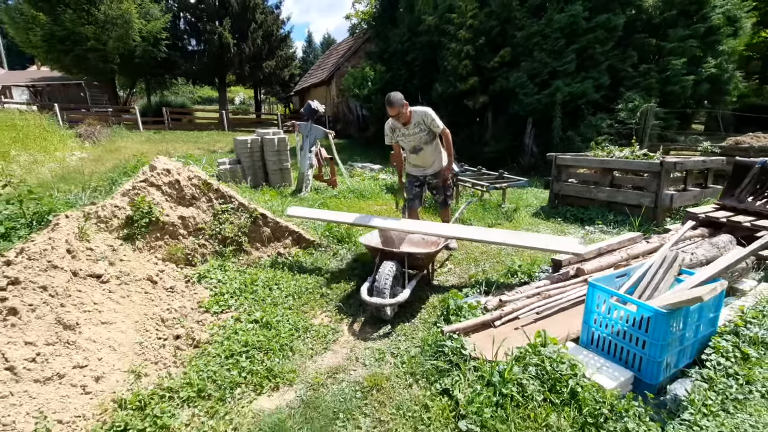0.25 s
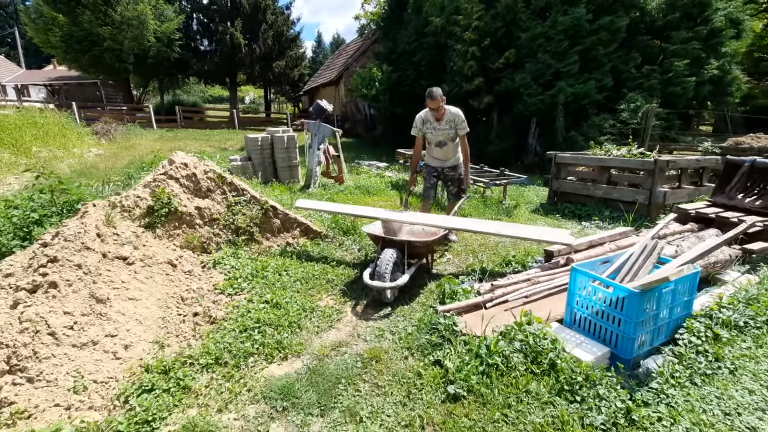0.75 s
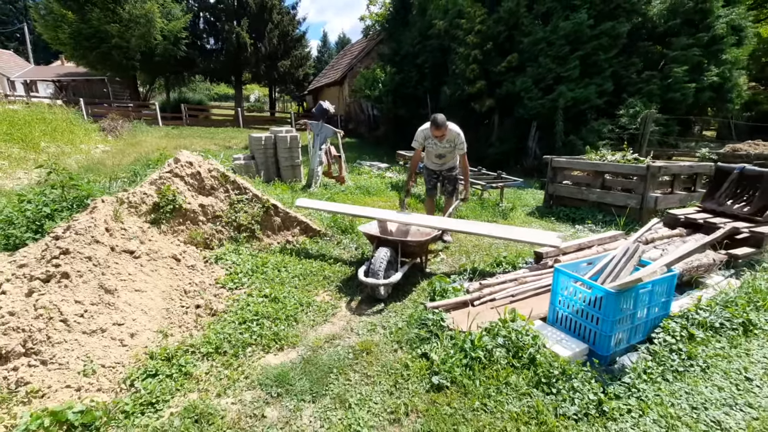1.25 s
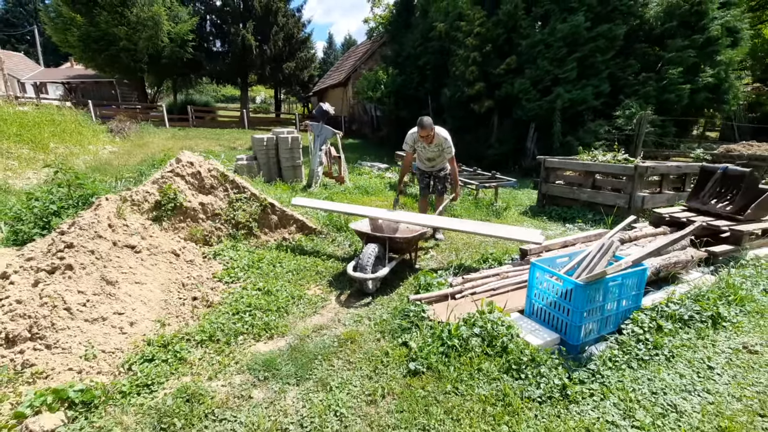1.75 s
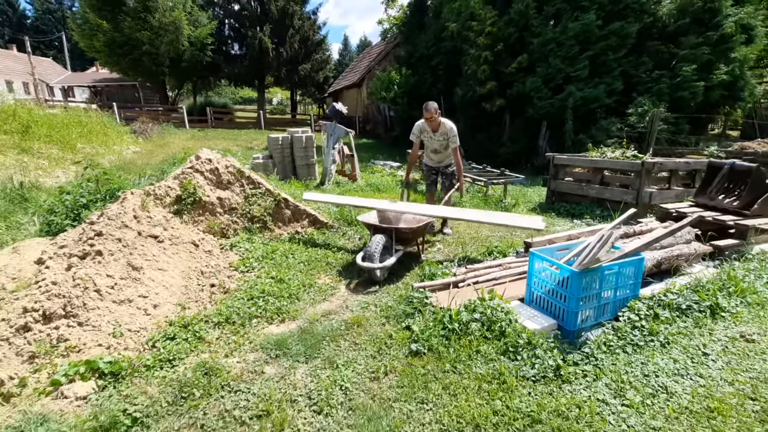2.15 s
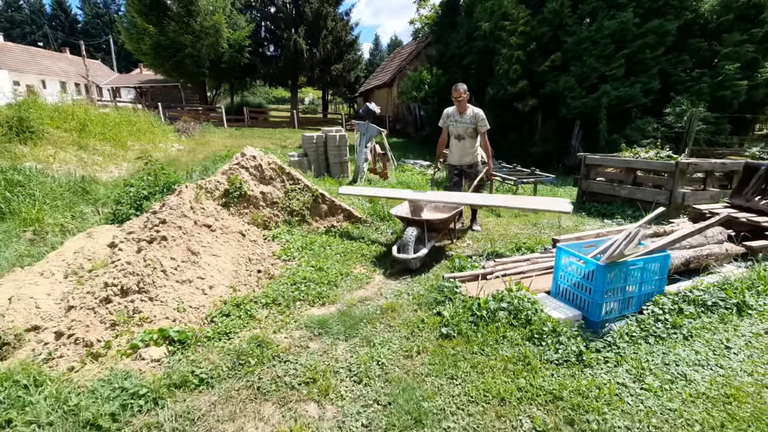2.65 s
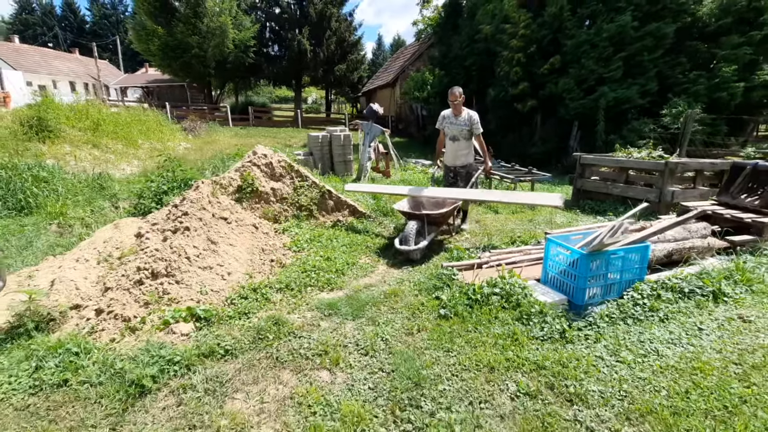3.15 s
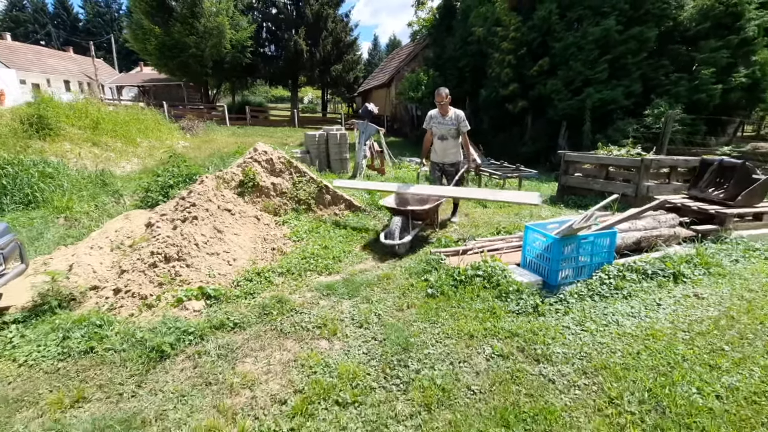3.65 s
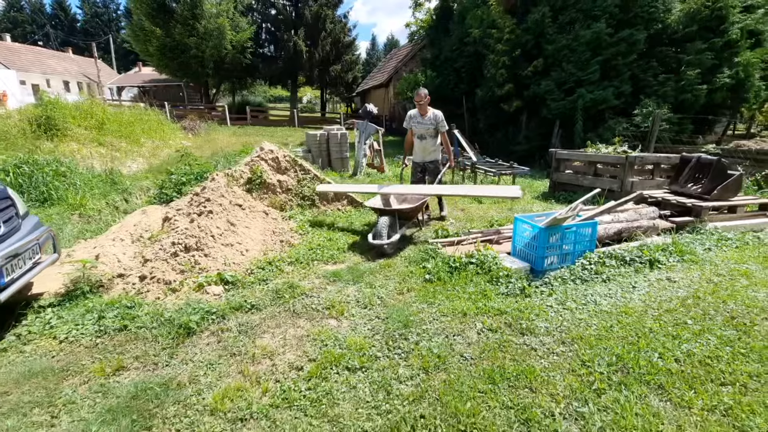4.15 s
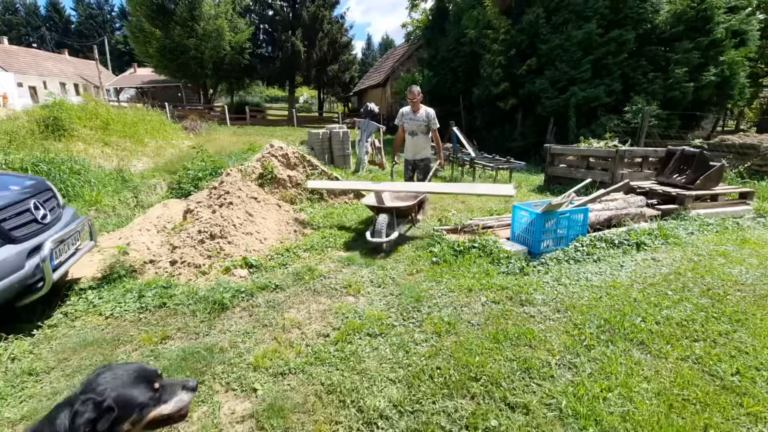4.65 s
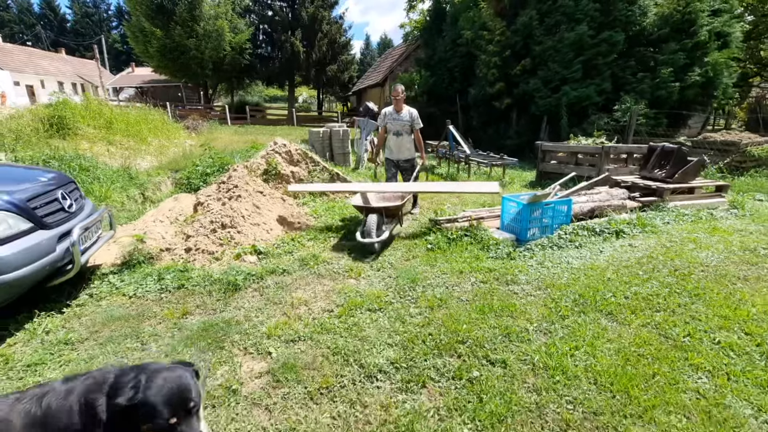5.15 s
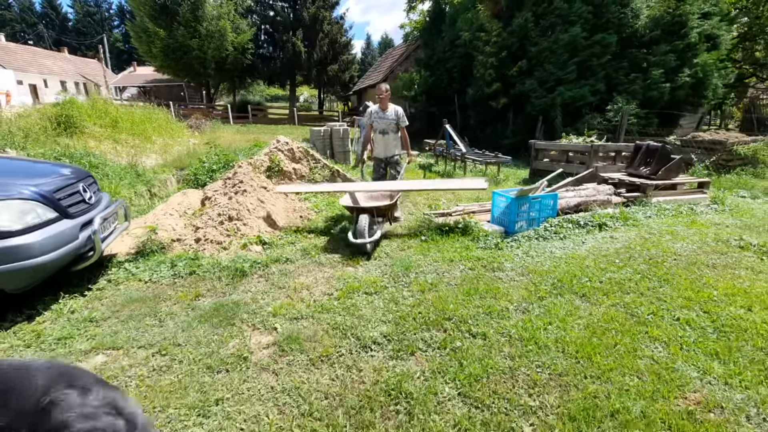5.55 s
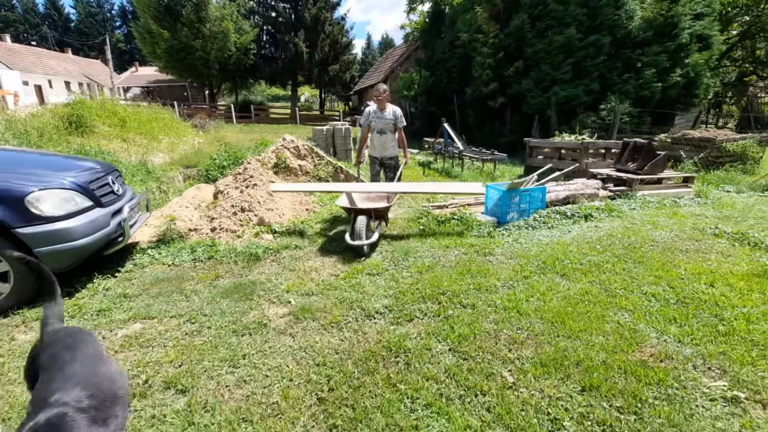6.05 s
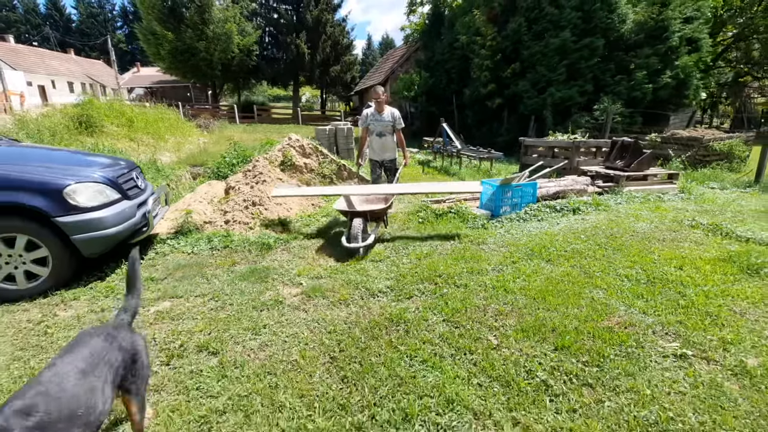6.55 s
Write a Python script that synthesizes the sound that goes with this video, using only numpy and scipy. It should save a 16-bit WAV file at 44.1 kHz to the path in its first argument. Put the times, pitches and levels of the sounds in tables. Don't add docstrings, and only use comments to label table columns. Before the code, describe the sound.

Faint bird whistles, a sudden hollow clunk of boards on a steel barrow, then grassy steps growing closer under soft thumping gusts.

```python
import sys
import numpy as np
from scipy import signal
from scipy.fft import rfft, irfft, next_fast_len
from scipy.io import wavfile
from scipy.ndimage import uniform_filter1d

SR = 44100
rng = np.random.default_rng(int(sys.argv[2]) if len(sys.argv) > 2 else 0)


def boost_factor(decibels):
    exponent = np.asarray(decibels, float) / 20
    return 10 ** exponent


def generate_wav(signal):
    frames = np.transpose(np.atleast_2d(signal))
    scaled = np.clip(frames, -1, 1) * 32767
    pcm = np.round(scaled).astype(np.int16)
    wavfile.write(sys.argv[1], SR, pcm)


N = 300321


def rms_one(x):
    return x / np.sqrt(np.mean(x ** 2) + 1e-20)


def shape(x, spectrum):
    size = next_fast_len(N)
    hz, db = np.transpose(spectrum)
    axis_hz = np.log(np.arange(size // 2 + 1) * SR / size + 1)
    gain = boost_factor(np.interp(axis_hz, np.log(hz), db, left=-90, right=-90))
    return irfft(rfft(x, size) * gain, size)[..., :N]


def colour(x, spectrum):
    return rms_one(shape(x, spectrum))


def drift(rate_hz):
    r = np.exp(-40 * np.pi * rate_hz / SR)
    white = rng.standard_normal(N // 20 + 4002)
    slow = signal.lfilter([1], [1, -2 * r, r * r], white)[4000:]
    return np.interp(np.arange(N) / 20, np.arange(len(slow)), rms_one(slow))


def ring(clicks, hz, t60):
    r, w = boost_factor(-60 / (t60 * SR)), 2 * np.pi * hz / SR
    return signal.lfilter([0, np.sin(w)], [1, -2 * r * np.cos(w), r * r], clicks + 1e-18)


def pair(x, pan_db):
    return np.array([x * boost_factor(pan_db / 2), x * boost_factor(-pan_db / 2)])


def grains(per_s, spread_db, alike, lag):
    sizes = boost_factor(spread_db * np.minimum(rng.exponential(1, (3, N)), 5)) * rng.choice([-1, 1], (3, N))
    both, left, right = sizes * (rng.random((3, N)) < per_s / SR)
    common, own = np.sqrt(alike), np.sqrt(1 - alike)
    return np.array([common * both + own * left, common * np.roll(both, lag) + own * right])


def swells(rows, rest_db, bluntness=1.66):
    s, width, *levels = np.transpose(rows)
    t = np.arange(0, N + 64, 64) / SR
    late = (t[:, None] - s) / np.maximum(width, .02)
    fall_db = 20 * np.where(late < 0, -late / 0.85, late) ** bluntness
    curves = []
    for db, rest in zip(levels, rest_db):
        power = boost_factor(2 * rest) + boost_factor(2 * (db - fall_db)).sum(axis=1)
        curves.append(np.interp(np.arange(N) / SR, t, 10 * np.log10(power)))
    return curves


def lull_db():
    centre_s, length_s = 1.344, 0.098
    return -8.5 * np.exp(-((np.arange(N) / SR - centre_s) / length_s) ** 2)


def echoes(x, level_db, t60):
    t = np.arange(round(.35 * SR)) / SR
    tail = rng.standard_normal((2, len(t))) * boost_factor(-60 * t / t60) * (t > .008)
    tail = rms_one(tail) / np.sqrt(len(t))
    return boost_factor(level_db) * signal.fftconvolve(x[None], tail, axes=1)[:, :N]


def bird_notes(table, flutter_db, rate, wobble, fade_db, drop_share):
    out, waver = np.zeros(N), drift(rate * 2)
    for s, length, top_hz, slide, db in table:
        u = np.linspace(0, 1, round(length * SR))
        glide = np.sin(np.pi * u) ** 0.574
        hz = top_hz * (1 - slide * (1 - glide) * np.where(u < .5, 1, drop_share))
        i = round(s * SR)
        hz = hz * (1 + wobble * waver[i:i + len(u)])
        envelope = boost_factor(db - 3.5 - fade_db * (u - 3.5)) * np.sin(np.pi * u) ** 0.093
        out[i:i + len(u)] += envelope * np.sin(2 * np.pi * np.cumsum(hz) / SR)
    return out * boost_factor(flutter_db * (drift(rate) + drift(rate * 5)) / np.sqrt(2))


def yard():
    # hz [Hz], level_db [dB per Hz]
    rustle = [(40, -38), (90, 0), (200, -18.5), (450, -15), (900, -19), (2000, -28), (3000, -25),
              (3600, -31), (4300, -25), (6200, -26), (10000, -32), (16000, -43)]
    noise = grains(SR, 0, 0.088, lag=0) * rng.standard_normal(N)
    return boost_factor(-68 + lull_db() + 0.09 * drift(9.7)) * colour(noise, rustle)


def whistles():
    # start_s [s], length_s [s], held_hz [Hz], slide_up [share], level_db [dB]
    far_notes = [(.002, .07, 685, 0, -73), (.004, .12, 2280, 0, -80), (.405, .12, 1940, 0, -75),
                 (.53, .12, 1950, 0, -80), (.63, .09, 1530, 0, -76), (.75, .17, 1565, .02, -77),
                 (.88, .3, 668, .03, -77), (1.06, .18, 1865, 0, -71), (1.35, .04, 670, 0, -75),
                 (6.55, .03, 2370, 0, -69), (.74, .4, 1772, .03, -70), (.892, .075, 1995, 0, -57),
                 (.99, .055, 1985, .04, -56.5), (1.05, .12, 1393, 0, -69), (1.18, .2, 1388, 0, -78),
                 (1.04, .15, 1978, 0, -65), (1.19, .15, 1985, 0, -69), (2.95, .065, 3830, .04, -66),
                 (2.97, .045, 3900, 0, -72), (2.96, .055, 3570, 0, -75), (3.028, .05, 3830, 0, -71),
                 (3.09, .19, 3225, 0, -77), (3.12, .07, 3800, .05, -79), (3.25, .07, 4370, .04, -82),
                 (3.5, .07, 2800, -.01, -69), (3.6, .1, 2780, .03, -76), (3.83, .17, 3170, -.02, -71),
                 (3.96, .09, 3680, 0, -77), (4.0, .04, 2760, -.01, -68), (4.04, .14, 2740, 0, -77),
                 (4.3, .07, 2920, .01, -73), (5.14, .14, 2975, 0, -70), (5.12, .07, 3900, 0, -75),
                 (5.565, .07, 7860, .003, -67), (5.635, .05, 7900, 0, -79), (6.7, .1, 2270, -.03, -59),
                 (6.705, .09, 2520, 0, -67), (6.75, .055, 2800, .05, -67)]
    return bird_notes(far_notes, 2.4, 70, .006, fade_db=3, drop_share=.1)


def sweeps():
    # start_s [s], length_s [s], from_hz [Hz], to_hz [Hz], level_db [dB]
    glides = [(0.037, 0.038, 4070, 4670, -62), (1.044, .02, 4300, 4650, -65),
              (1.041, 0.025, 4100, 4190, -68), (2.231, 0.036, 4710, 5060, -54.5),
              (2.267, 0.0063, 5073, 4360, -57), (2.357, 0.0092, 4340, 5030, -59),
              (2.799, 0.035, 4806, 4660, -53), (2.802, 0.022, 5330, 5130, -56),
              (2.817, .018, 5070, 5330, -55), (0.924, 0.021, 4280, 4570, -71),
              (0.955, 0.027, 2040, 1890, -66), (2.9, 0.045, 3117, 3680, -64),
              (4.766, 0.045, 3064, 3350, -65.5), (4.899, 0.06, 3613, 3050, -71),
              (4.94, 0.057, 3003, 3250, -68)]
    out = np.zeros(N)
    for s, length, from_hz, to_hz, db in glides:
        hz, i = np.linspace(from_hz, to_hz, round(length * SR)), round(s * SR)
        envelope = boost_factor(db + 1.0) * np.hanning(len(hz)) ** 0.19
        out[i:i + len(hz)] += envelope * np.sin(2 * np.pi * np.cumsum(hz) / SR)
    return out * boost_factor(3.6 * drift(150))


def wind():
    # peak_s [s], die_away_s [s], level_db [dB], eddy_hz [Hz]
    gusts_left = [(0.1, 0.085, -81, 103.1), (0.287, 0.086, -48, 86.8), (0.518, 0.064, -51, 66.4),
                  (0.594, 0.051, -50.5, 65.74), (0.798, 0.1, -43.5, 78.5), (0.88, 0.13, -38.5, 90.7),
                  (1.058, 0.099, -57, 66.5), (1.116, 0.17, -48, 69.7), (1.371, 0.052, -44, 117.6),
                  (1.538, 0.068, -47, 74.76), (1.669, 0.058, -50, 63.4), (1.806, 0.18, -48.5, 165),
                  (1.895, 0.08, -40.5, 87.5), (2.149, 0.18, -43.5, 73.03), (2.395, 0.18, -44, 59.7),
                  (2.639, 0.12, -48, 74.2), (2.729, 0.13, -56, 69.9), (2.789, 0.069, -51, 74.7),
                  (2.943, 0.134, -69, 90), (3.053, 0.086, -61, 72.9), (3.128, 0.081, -56, 62.44),
                  (3.293, 0.088, -61, 65.24), (3.347, 0.056, -44, 66.12), (3.567, 0.079, -72, 82.6),
                  (3.692, 0.052, -44, 76), (3.802, 0.086, -47, 73.9), (3.945, 0.1, -41.5, 77.66),
                  (4.096, 0.063, -55, 68.04), (4.36, 0.12, -48, 63.3), (4.485, 0.091, -42.5, 93.1),
                  (4.788, 0.11, -47.5, 67.06), (4.939, 0.04, -50.5, 65), (5.078, 0.074, -46, 74.7),
                  (5.263, 0.077, -42.5, 65.6), (5.358, 0.12, -46, 62.35), (5.507, 0.093, -52, 70.6),
                  (5.627, 0.055, -48, 75.1), (5.697, 0.066, -46, 74.34), (5.872, 0.099, -41.5, 67.9),
                  (5.991, 0.06, -56, 67.3), (6.131, 0.12, -51, 65.2), (6.221, 0.09, -45, 76.2),
                  (6.271, 0.093, -54, 77.8), (6.43, 0.095, -51.5, 78.3), (6.53, 0.083, -45, 73.2),
                  (6.7, 0.064, -41, 62.55), (6.785, 0.057, -46, 82.2)]
    gusts_right = [(0.15, 0.069, -78, 93.2), (0.294, 0.068, -79, 101), (0.364, 0.097, -76, 82.7),
                   (0.414, 0.113, -76, 78.7), (0.509, 0.136, -80, 75.7), (0.693, 0.144, -77, 81.7),
                   (0.798, 0.12, -78, 89.5), (0.863, 0.11, -67, 95.9), (1.112, 0.072, -37.5, 97.3),
                   (1.193, 0.14, -41, 76.8), (1.392, 0.099, -45, 78.6), (1.546, 0.11, -41.5, 96.3),
                   (1.606, 0.057, -46, 71.7), (1.671, 0.13, -53, 79.4), (1.806, 0.17, -54, 167.3),
                   (2.065, 0.12, -44.5, 107.6), (2.27, 0.074, -40.5, 108.2), (2.326, 0.18, -35, 78.8),
                   (2.499, 0.083, -57.5, 75.3), (2.549, 0.17, -50.9, 87.2), (2.734, 0.13, -46.5, 70.54),
                   (2.82, 0.081, -41, 103.4), (2.938, 0.079, -57.5, 80), (3.158, 0.13, -34.5, 108),
                   (3.393, 0.082, -38, 84.27), (3.656, 0.057, -31.5, 111.2), (3.847, 0.063, -42, 108.1),
                   (3.996, 0.091, -37, 95.5), (4.086, 0.08, -51.5, 84.9), (4.37, 0.076, -34.5, 94.8),
                   (4.465, 0.093, -40, 80), (4.679, 0.075, -65, 75.2), (4.779, 0.068, -56, 84.9),
                   (4.934, 0.057, -53, 67.87), (5.103, 0.13, -47, 76.25), (5.268, 0.098, -50, 67.4),
                   (5.378, 0.09, -38.5, 71.4), (5.542, 0.061, -48.5, 95.45), (5.612, 0.074, -45.5, 81.3),
                   (5.672, 0.078, -44.5, 82.1), (5.862, 0.074, -43, 86.16), (6.056, 0.081, -37.5, 80.7),
                   (6.276, 0.11, -53, 69.24), (6.361, 0.063, -37.5, 105.7), (6.42, 0.079, -38.5, 87.04),
                   (6.48, 0.057, -34.5, 86.86), (6.56, 0.077, -41, 92.8), (6.8, 0.065, -33, 100.4),
                   (3.591, 0.078, -32, 85.9),
        (4.24, 0.13, -53, 69.92),
    ]
    # hz [Hz], level_db [dB per Hz]
    eddy_spectrum = [(20, -3), (35, -14), (55, 1.5), (85, -1), (120, -7), (200, -28.5), (400, -44.5)]
    edge_spectrum = [(50, -21), (120, 8.5), (200, -11), (350, -16.5), (600, -49), (1200, -64)]
    calm_db, eddy_pitch_hz = -74, 80
    out, t = [], np.arange(N) / SR
    for rows in (np.array(gusts_left), np.array(sorted(gusts_right))):
        own_db, = swells(rows[:, :3], [calm_db], 1.19)
        speed = np.interp(t, rows[:, 0], rows[:, 3].clip(50, 125)) / eddy_pitch_hz
        rumble = colour(rng.standard_normal(N), eddy_spectrum)
        eddies = np.interp(np.cumsum(speed) % N, np.arange(N), rumble)
        eddies = eddies / (uniform_filter1d(eddies ** 2, size=1600) + 0.057) ** 0.43
        body = boost_factor(own_db + 2.4 + 1.28 * drift(32.0)) * rms_one(eddies)
        edge = colour(rng.standard_normal(N), edge_spectrum)
        edge = edge / (uniform_filter1d(edge ** 2, size=1600) + 0.063) ** 0.57
        edge_db = -56 + 1.36 * (own_db + 44.5) + 7.9 * np.log2(speed) + 2.0 * drift(50)
        out.append(body + boost_factor(edge_db) * edge)
    return np.array(out)


def barrow():
    # start_s [s], peak_db [dB], hardness [0-1.5, more for a sharp click]
    knocks = [
        (1.734, -34, 0.3),
        (1.746, -33, 0.28),
        (1.7814, -36, 1.44),
        (1.7861, -16.5, 0.62),
        (1.803, -39, 0.7),
        (1.829, -45, 1),
        (1.855, -28, 0.42),
        (1.884, -31.5, 0.32),
        (1.902, -45.5, 0.64),
        (1.763, -35, 0.3),
    ]
    # pitch_hz [Hz], level_db [dB], t60_s [s]
    modes = [(132, -15, 0.37), (172.6, -1.5, 0.3), (228, -12, 0.088), (250.1, -9, 0.11), (270, 3.5, .13),
             (291, 3, .28), (339.8, -7.5, 0.32), (398, -12, 0.24), (614, -10, 0.2), (681, -2, 0.2),
             (732, 0, .3), (760, -2, 0.18), (856, -8, 0.16), (910, -9, 0.16), (1130, -12, .2),
             (1340, -7, 0.19), (1491, -3, .13), (1550, 1, .13), (1992, -14, .09), (2186, -9, .1),
             (2800, -9, .09), (3181, -9, .06)]
    # peak_s [s], die_away_s [s], level_db [dB]
    shakes = [
        (.15, 0.24, -78.5),
        (1.12, 0.37, -57.5),
        (2.8, 0.37, -59.5),
        (3.16, 0.099, -62),
        (3.66, 0.084, -55),
        (3.87, 0.11, -59),
        (4.46, 0.27, -57.5),
        (2.42, 0.12, -63),
        (2.63, 0.061, -55),
        (5.9, 0.14, -59),
    ]
    s, db, hard = np.transpose(knocks)
    at, out, shake = np.round(s * SR).astype(int), np.zeros((2, N)), 0
    for (hz, level_db, t60), luck in zip(modes, rng.standard_normal((len(modes), 2, len(at)))):
        clicks = np.zeros((2, N))
        strength_db = db + level_db - 17.5 - 12 * (1 - hard) * np.log2(hz / 250).clip(0)
        lean_db = 1.2 + 1.5 * luck[1] * (hz > 1000)
        clicks[:, at] = boost_factor(strength_db + 1.5 * luck[0] + np.outer([1, -1], lean_db))
        out += ring(clicks, hz, t60) * np.sign(hz - 240)
        if 250 < hz < 800:
            hum = ring(rng.standard_normal(N), hz, t60 * 0.17)
            shake = shake + boost_factor(level_db - 12.3 * (hz > 500)) * hum
    hits = np.zeros(N)
    hits[at] = boost_factor(db) * np.clip(hard, 0, 2) ** 2
    for low_hz, high_hz, t60, level_db in ((3180, 7500, 0.018, -14), (1220, 2740, 0.11, -14.5),
                                           (670, 1000, 0.21, -18), (201, 375, 0.56, -25.5)):
        envelope = signal.lfilter([1], [1, -boost_factor(-60 / (t60 * SR))], hits + 1e-18)
        band = [(low_hz / 2, -20), (low_hz, 0), (high_hz, -3), (high_hz * 1.28, -25)]
        out += boost_factor(level_db) * envelope * colour(grains(6700, 2.5, 0.85, lag=0), band)
    settled_db = -72.5
    shake_db = swells(shakes, [settled_db])[0] - 5.0
    return out + pair(boost_factor(shake_db) * rms_one(shake), 0.15)


def trills():
    # start_s [s], length_s [s], level_db [dB]
    bursts = [
        (0.214, 0.12, -70.5),
        (0.646, 0.11, -70),
        (1.103, 0.089, -65.5),
        (1.269, 0.067, -67),
        (2.223, 0.19, -62.5),
        (3.311, 0.11, -66),
    ]
    level = np.zeros(N)
    for s, length, db in bursts:
        arch = np.hanning(round(length * SR)) ** .5
        level[round(s * SR):round(s * SR) + len(arch)] = boost_factor(db) * arch
    throb = np.sin(np.pi * 95 * np.arange(N) / SR) ** 2
    return level * throb * 1.8 * rms_one(ring(rng.standard_normal((2, N)), 6080, 0.0033))


def grass():
    # peak_s [s], die_away_s
    # [s], sole_press_db [dB], blade_sweep_db [dB]
    strides = [(0.35, 0.26, -76, -86), (0.953, 0.16, -64, -73.5), (.87, 0.05, -70, -87),
               (1.114, 0.15, -65, -90), (1.487, 0.18, -62, -80), (1.612, 1, -72.5, -78),
               (2.026, 0.14, -61, -70), (2.15, 0.38, -71.5, -75), (2.417, 0.032, -84.5, -76.5),
               (2.541, 0.18, -75, -75.5), (2.818, 0.45, -73, -77.5), (2.948, 0.11, -59.5, -70),
               (3.102, 0.18, -77, -76.5), (3.474, 0.18, -70.5, -78.5), (3.75, 0.31, -59, -66.5),
               (3.887, 0.17, -64.5, -69), (4.225, 0.091, -64.5, -89), (4.45, 0.73, -90, -74),
               (4.59, 0.15, -62, -70), (4.709, 0.1, -62, -71), (5.091, 0.19, -61.5, -68.5),
               (5.285, 0.05, -58.5, -66.5), (5.35, 0.19, -57.5, -61), (5.473, 0.12, -60, -65),
               (5.53, 0.038, -67, -72.5), (5.694, 0.046, -68, -71), (5.833, 0.18, -63.5, -66.5),
               (6.133, 0.26, -59.5, -63), (6.259, 0.13, -63, -68), (6.585, 0.23, -61, -67.5),
               (6.698, 0.095, -63, -101), (6.781, 0.13, -54, -63)]
    # peak_s [s], die_away_s [s], level_db [dB]
    weeds = [(.33, 0.19, -74), (1.03, 0.17, -62.5), (1.2, 0.15, -61), (3.1, 0.17, -74), (1.58, 0.2, -60.5),
             (2.57, 0.091, -62.5), (2.72, 0.59, -66.5), (2.86, 0.14, -62.5), (3.68, 0.11, -54.5),
             (3.47, 0.12, -64), (4.24, 0.075, -61), (4.42, 0.63, -61), (6.75, 0.13, -57)]
    # hz [Hz], level_db [dB per Hz]
    sole_spectrum = [(300, -14), (600, -9), (850, -4), (1150, -0.5), (1600, -2.5), (2300, -17)]
    stem_spectrum = [(1000, -19), (1600, -4), (2200, -0.5), (3000, -3.5), (3600, -11.5), (5000, -7.5)]
    blade_spectrum = [(2500, -9), (3600, -8), (5200, -8), (6300, -4), (8500, -6.5), (11000, -58)]
    tip_spectrum = [(6000, -24), (9000, 1.5), (11000, -1), (13500, -2), (16000, -7)]
    still_press_db, still_sweep_db = -89.5, -87.5
    sole_db, tip_db = swells(strides, (still_press_db, still_sweep_db), 1.554)
    stem_db = sole_db + 0.041 * (tip_db - sole_db)
    stem_db = 10 * np.log10(boost_factor(2 * stem_db) + boost_factor(2 * swells(weeds, [-100])[0]))
    blade_db = -61.5 + 0.85 * (tip_db + 65.5)
    sole = colour(grains(1400, 1.1, 0.75, lag=4), sole_spectrum)
    sole = boost_factor(sole_db + 1.5 + 2.0 * drift(19)) * sole * boost_factor([[1.2], [-1.2]])
    stems = colour(grains(4000, 0.46, 0.77, lag=3), stem_spectrum)
    stems = boost_factor(stem_db - 0.5 + 2.0 * drift(39)) * stems * boost_factor([[-.3], [.3]])
    blades = colour(grains(12000, 3.0, 0.089, lag=4), blade_spectrum)
    blades = boost_factor(blade_db + 5.5 + 1.27 * drift(33.0)) * blades * boost_factor([[-.8], [.8]])
    tips = colour(grains(12000, 2.2, 0.059, lag=3), tip_spectrum)
    tips = boost_factor(tip_db + 5.0 + 1.2 * drift(32)) * tips * boost_factor([[3.0], [-4.0]])
    return sole + stems + blades + tips


def chirps():
    # start_s [s], length_s [s], top_hz [Hz], rise_to_top [share], level_db [dB]
    near_notes = [
        (.446, 0.052, 4820, 0.2, -68.5),
        (.476, 0.016, 5070, .03, -64.5),
        (.558, 0.032, 4256, 0.17, -72.5),
        (.645, .035, 4180, 0.083, -73),
        (.925, 0.062, 5317, 0.3, -64),
        (.945, 0.021, 5100, 0.14, -64),
        (3.962, 0.042, 4999, 0.01, -59),
        (4.81, 0.068, 4154, 0.021, -72),
    ]
    return bird_notes(near_notes, 4.5, 110, .018, fade_db=1.5, drop_share=.65)


def snaps():
    # start_s [s], peak_db [dB], ring_hz [Hz], dryness_db [dB]
    stalks = [(1.452, -40, 1420, -21), (1.472, -36, 1354, -27), (1.486, -35, 1508, -20),
              (1.525, -36, 2100, -14), (1.61, -48, 1512, -8), (1.984, -39.5, 1200, -31),
              (2.032, -37, 991.4, -25), (2.343, -55, 1070, -4), (2.417, -54, 2853, 5.5),
              (2.543, -42, 2130, -22), (2.553, -41, 1492, -29), (2.732, -42.5, 1460, -31),
              (3.206, -43.5, 1347, -27), (4.196, -37.5, 1459, -15), (4.205, -43, 1346, -13),
              (4.219, -29, 1420, -15.5), (4.222, -34.5, 1860, -13), (4.23, -37, 1667, -15),
              (4.25, -48, 1940, -22), (5.22, -36, 951.3, -19), (5.445, -29.5, 1020, -20.5),
              (5.69, -57.5, 1959, 4), (6.114, -45, 1129, -3), (6.497, -40, 1410, -19),
              (6.67, -45, 1156, -23)]
    out, t = np.zeros((2, N)), np.arange(600) / SR
    mid_band = signal.butter(2, [3000, 8000], "band", fs=SR, output="sos")
    high_band = signal.butter(2, [9800, 14000], "band", fs=SR, output="sos")
    for (s, db, hz, dry_db), noise in zip(stalks, rng.standard_normal((len(stalks), 600))):
        burst = noise * boost_factor(-60 * t / 0.0063)
        body = np.sin(2 * np.pi * hz * t) * boost_factor(-60 * t / .007)
        body = body + .5 * np.sin(2 * np.pi * 1.9 * hz * t) * boost_factor(-60 * t / .005)
        tick = boost_factor(dry_db + 11.5) * signal.sosfilt(mid_band, burst)
        tick = tick + boost_factor(2.4 * dry_db + 10.5) * signal.sosfilt(high_band, burst)
        snap = boost_factor(db - 4.5) * np.minimum(t / .0004, 1) * (body + tick)
        out[:, round(s * SR):round(s * SR) + 600] += pair(snap, 5)
    return out


def turf():
    # peak_s [s], die_away_s [s], level_db [dB]
    scuffs = [
        (3.72, 0.096, -58.5),
        (3.82, 0.15, -58.5),
        (4.6, .12, -61),
        (5.37, 0.14, -56),
        (6.14, 0.14, -59.5),
    ]
    # hz [Hz], level_db [dB per Hz]
    crunch = [(600, -29), (850, -6.5), (1100, 2.5), (1450, -5), (2000, -30)]
    level_db = swells(scuffs, [-110], 2.6)[0] + 1.5 * drift(42)
    return boost_factor(level_db) * colour(grains(700, 1.9, 0.95, lag=2), crunch) * boost_factor([[1.2], [-1.2]])


def scene():
    far_birds = whistles()
    far = boost_factor(-2.5) * pair(far_birds, -3.5) + echoes(far_birds, -5, .4)
    near_birds = sweeps() + chirps()
    near = boost_factor(-1.5) * pair(near_birds, -6) + echoes(near_birds, -17, .25)
    birds = far + near + trills()
    load = barrow()
    load = load + echoes(load.mean(0), -10.0, 0.18)
    feet = boost_factor(lull_db()) * grass() + snaps() + turf()
    return yard() + birds + wind() + load + feet


def band_limit(x):
    return signal.sosfilt(signal.butter(12, 16370, fs=SR, output="sos"), x)


def record(dry):
    # hz [Hz], gain_db [dB]
    microphone = [(18, -29), (45, -0.5), (7700, -0.5), (8450, -7.5), (9150, -18.5), (9650, -3.5),
                  (9900, -7), (11000, -2.5), (15740, 4.5), (15800, -79)]
    return band_limit(shape(dry, microphone))


dry = scene()
out = record(dry)
generate_wav(out)
```